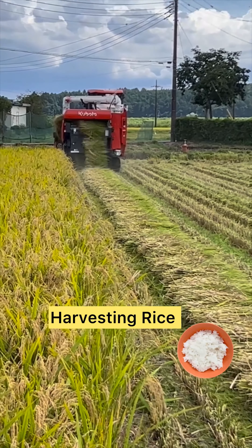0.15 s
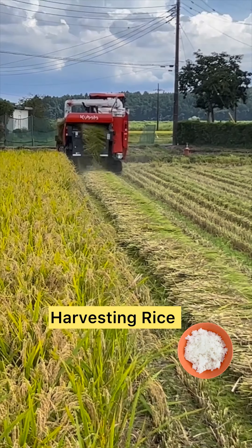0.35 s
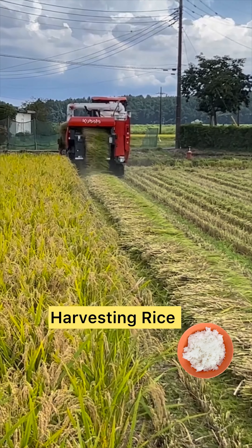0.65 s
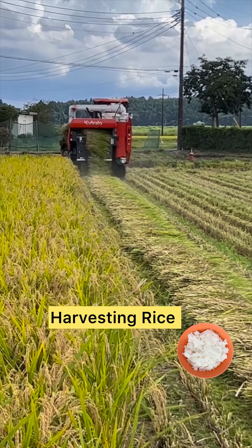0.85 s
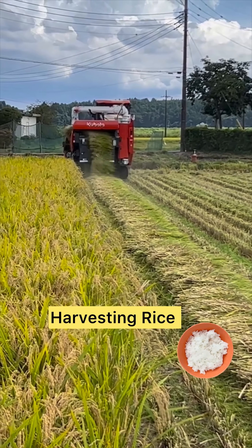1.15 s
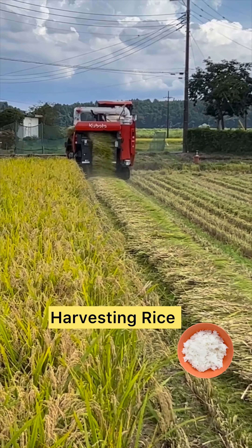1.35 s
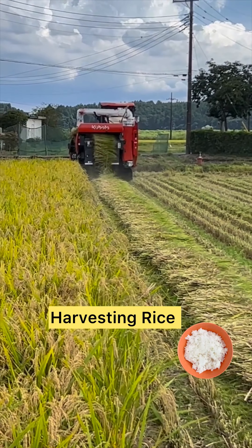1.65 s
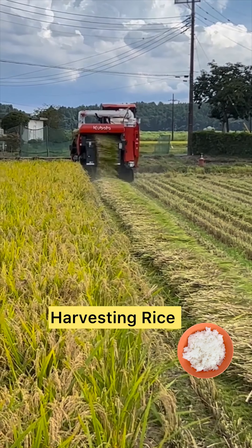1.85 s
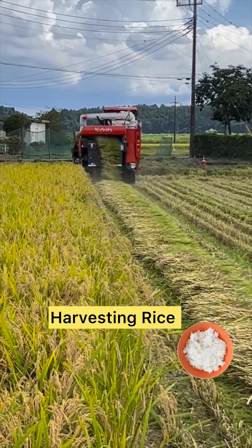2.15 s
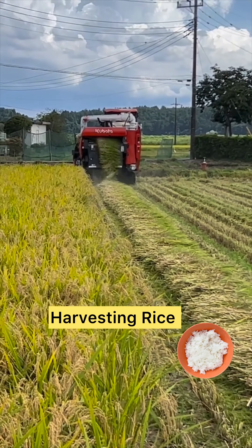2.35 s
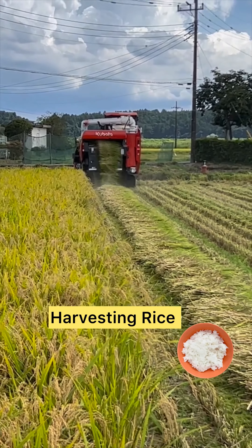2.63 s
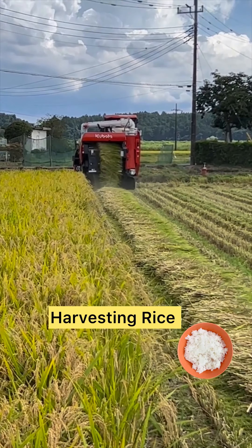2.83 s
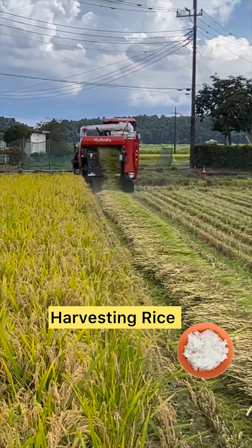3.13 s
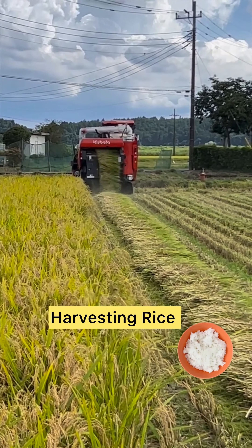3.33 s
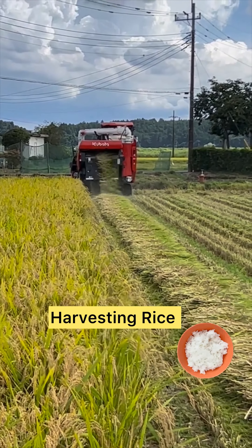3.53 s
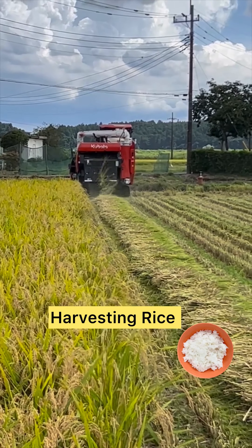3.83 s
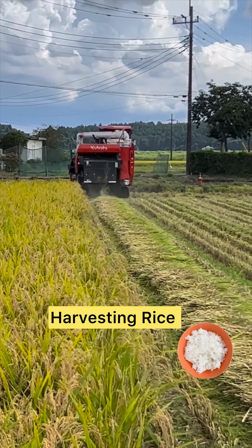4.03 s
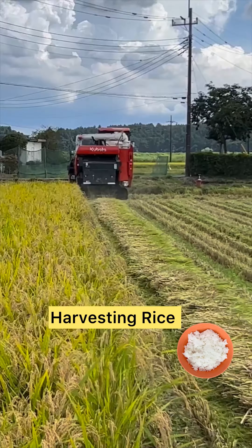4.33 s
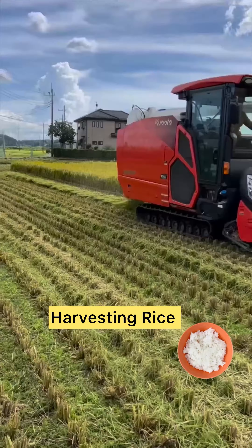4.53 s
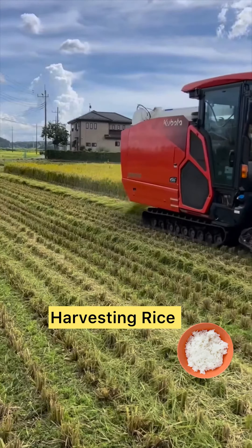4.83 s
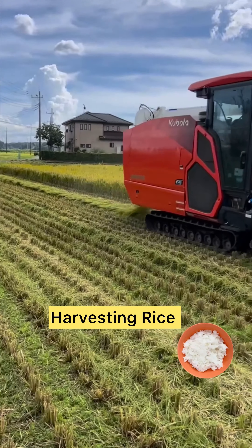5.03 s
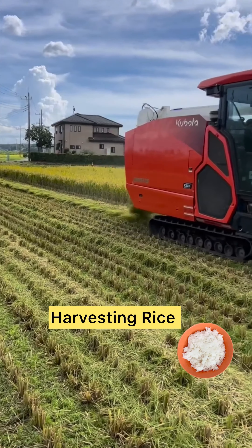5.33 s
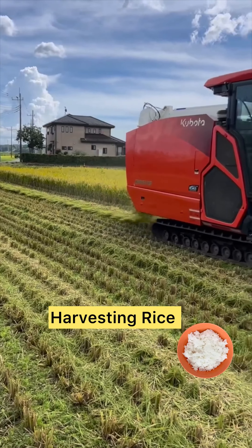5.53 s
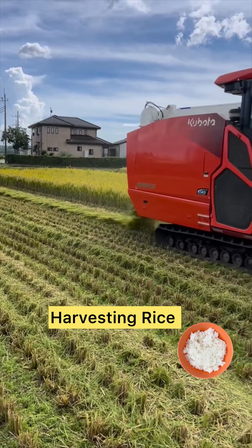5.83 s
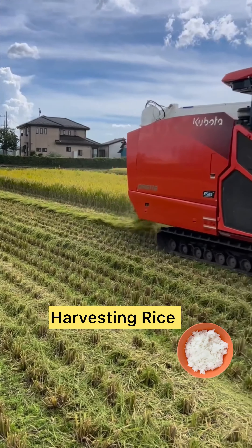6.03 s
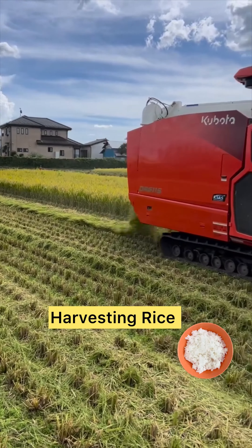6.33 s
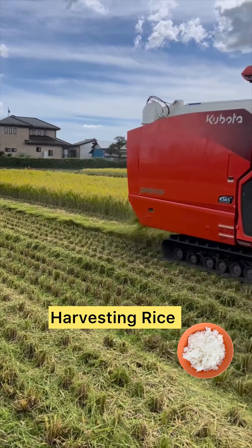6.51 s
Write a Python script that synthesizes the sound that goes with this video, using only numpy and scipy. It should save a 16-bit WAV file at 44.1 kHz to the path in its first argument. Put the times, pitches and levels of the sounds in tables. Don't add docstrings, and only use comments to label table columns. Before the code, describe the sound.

Outdoors in an open rice field, a diesel harvester drones at a distance, its low roar and soft threshing hiss slowly fading as it drives away. Dry leaves rustle faintly near the microphone. At about four and a half seconds a hard cut makes the machine suddenly loud and close, with full engine roar, clattering drum and sieves, a humming fan and a low drive motor that winds up near the end.

```python
import sys
import numpy as np
from scipy import signal
from scipy.fft import rfft, irfft, next_fast_len
from scipy.io import wavfile

SR = 44100
rng = np.random.default_rng(int(sys.argv[2]) if len(sys.argv) > 2 else 0)


def amplitude_ratio(level_db):
    exponent = np.asarray(level_db, float) / 20
    return 10 ** exponent


def persist_wave(psi):
    counts = np.round(np.clip(psi, -1, 1) * 32767).astype(np.int16)
    wavfile.write(sys.argv[1], SR, np.atleast_2d(counts).T)


N = 294147
CUT_S = 4.4537
FAN_HZ = 390.6
THUD_TOP_HZ = 110.3


def rms_one(x):
    return x / np.sqrt(np.mean(x ** 2) + 1e-20)


def at_hz(rows, hz):
    f, *columns = np.transpose(rows)
    return [np.interp(np.log(hz + 1), np.log(f), c) for c in columns]


def smooth_step(t, at_s, width_s):
    return .5 + .5 * np.tanh((t - at_s) / width_s / 2)


def swell(t, at_s, width_s):
    return np.exp(-((t - at_s) / width_s) ** 2 / 2)


def drift(rate, size):
    r = np.exp(-80 * np.pi * rate / SR)
    noise = rng.standard_normal(size // 40 + 4002)
    slow = signal.lfilter([1], [1, -2 * r, r * r], noise)[4000:]
    return np.interp(np.arange(size) / 40, np.arange(len(slow)), rms_one(slow))


def knocking(size, per_s, spread_db, ring_s, share):
    strength = amplitude_ratio(spread_db * np.minimum(rng.exponential(1, size), 3))
    hits = (rng.random(size) < per_s / SR) * strength
    ringing = signal.lfilter([1], [1, -np.exp(-1 / (ring_s * SR))], hits + 1e-18)
    return 1 + share * rms_one(ringing)


def tone(hz, size, wander, beat_db):
    phase = 2 * np.pi * np.cumsum(hz * (1 + wander * drift(2.32, size))) / SR
    beating = amplitude_ratio(beat_db * drift(4.9, size))
    return rms_one(beating * np.sin(phase + rng.uniform(0, 2 * np.pi)))


def wash(spectrum, low_hz, high_hz, gate, together, patchy_db):
    count = len(gate)
    size = next_fast_len(count)
    hz = np.arange(size // 2 + 1) * SR / size
    colour = rfft(gate * rng.standard_normal((2, count)), size) * amplitude_ratio(at_hz(spectrum, hz)[0])
    colour = colour / np.sqrt((1 + (low_hz / (hz + 1)) ** 12) * (1 + (hz / high_hz) ** 12))
    octave = np.log2((hz + 1) / 30)
    out = 0
    for k in range(int(np.log2(low_hz / 45)), int(np.log2(high_hz / 20)) + 2):
        band = np.clip(1 - np.abs(octave - k), 0, 1)
        out = out + irfft(colour * band, size)[:, :count] * amplitude_ratio(patchy_db * drift(1.45, count))
    return rms_one(out * amplitude_ratio(together))


# (time [s], length [s], low edge [Hz], high edge [Hz], level [dB])
RASPS = [
    (.198, .044, 12600, 14000, -48),
    (4.255, .015, 10500, 12500, -54),
    (4.3, .02, 12000, 15500, -53),
    (4.345, .035, 10000, 13500, -52),
    (4.1, .45, 9700, 15700, -53),
    (4.37, .1, 6500, 15700, -48),
]


def leaves(t):
    out = np.zeros((2, len(t)))
    for start, length, low_hz, high_hz, level_db in RASPS:
        now = (t > start) & (t < start + length)
        band = signal.butter(4, [low_hz, high_hz], "band", fs=SR, output="sos")
        hiss = signal.sosfilt(band, rng.standard_normal((2, now.sum())))
        out[:, now] += amplitude_ratio(level_db) * rms_one(hiss) * signal.windows.tukey(now.sum(), .4)
    return out


def far_fan(t):
    bite_s, sag_hz, recover_s = 0.69, 4.03, 0.305
    bitten = smooth_step(t, bite_s, .03) * np.exp(-np.maximum(t - bite_s, 0) / recover_s)
    muted_db = 13 * swell(t, bite_s + 0.035, 0.03)
    hidden_db = 10 * smooth_step(t, 1.77, 0.15)
    return FAN_HZ - sag_hz * bitten, -65, -52 - muted_db - hidden_db


def near_fan(t):
    facing = swell(t, 5.57, 0.43)
    return FAN_HZ, -31.5 + 6.5 * facing, -31.5 - 1.5 * facing


def fan_tones(size, blade_hz, blade_db, octave_db):
    blade = amplitude_ratio(blade_db) * tone(blade_hz, size, wander=0.003, beat_db=2.5)
    return blade + amplitude_ratio(octave_db) * tone(2 * blade_hz, size, wander=0.0028, beat_db=0.0)


def drive_motor(t):
    cruise_hz, fast_hz, cruise_db, fast_db = 60.5, 76.7, -24.5, -21
    fast = smooth_step(t, 5.86, .12)
    level_db = cruise_db + (fast_db - cruise_db) * fast
    level_db = level_db - 3 * swell(t, 5.43, .17) - 7.0 * swell(t, CUT_S, 0.11)
    hz = cruise_hz + (fast_hz - cruise_hz) * fast
    return amplitude_ratio(level_db) * tone(hz, len(t), wander=.018, beat_db=2.2)


def shaft_hum(t, hum):
    middle_s = t.mean()
    return sum(amplitude_ratio(db + db_per_s * (t - middle_s)) * tone(hz, len(t), wander=0.00201, beat_db=1.7)
               for hz, db, db_per_s in hum)


def combustion(size, roar, top_hz, thud_db, roar_db, load):
    firing = knocking(size, 90, spread_db=-6.0, ring_s=0.0071, share=0.18)
    thud = wash(roar, 25, THUD_TOP_HZ, np.ones(size), 0, patchy_db=-0.1)
    roaring = wash(roar, THUD_TOP_HZ, top_hz, firing, 0.19 * load, patchy_db=1.03)
    return amplitude_ratio(thud_db) * thud + amplitude_ratio(roar_db) * roaring


def threshing(size, clatter, low_hz, rustle_hz, clatter_db, rustle_db, load, knock_share):
    beaters = knocking(size, 110, spread_db=4.0, ring_s=0.009, share=knock_share)
    clattering = wash(clatter, low_hz, rustle_hz, beaters, load, patchy_db=0.4)
    rustling = wash(clatter, rustle_hz, 16300, beaters, load, patchy_db=0.68)
    return amplitude_ratio(clatter_db + 4.0) * clattering + amplitude_ratio(rustle_db + 4.5) * rustling


def harvester(t, levels_db, hum, fan, roar, clatter, roar_top_hz, rustle_hz, knock_share, gust_db):
    size = len(t)
    thud_db, roar_db, clatter_db, rustle_db = levels_db
    load = gust_db * drift(4.6, size)
    noise = combustion(size, roar, roar_top_hz, thud_db, roar_db, load)
    noise += threshing(size, clatter, roar_top_hz, rustle_hz, clatter_db, rustle_db, load, knock_share)
    tones = shaft_hum(t, hum) + fan_tones(size, *fan)
    return noise[0] + tones, noise[1]


# (thud, roar, clatter, rustle gain [dB/s])
TURN_GAIN_DB_PER_S = (1.5, 0.72, 2, 6.9)
# (time [s], rise [dB])
LURCHES = [
    (.1, 0.5),
    (.55, 1.5),
    (1.45, 3.5),
    (2.95, 0),
    (3.55, 1),
    (4.72, 8),
    (5.6, 2.5),
    (6.5, 2),
]


def layer_levels(t, start_db, loss_db_per_s, away_until_s):
    turn_s = 0.83
    away = np.minimum(t, away_until_s) - t[0]
    turning = turn_s * np.tanh(np.maximum(t - away_until_s, 0) / turn_s)
    thud_db, *rest = (db - loss * away + gain * turning
                      for db, loss, gain in zip(start_db, loss_db_per_s, TURN_GAIN_DB_PER_S))
    return thud_db + sum(db * swell(t, s, 0.19) for s, db in LURCHES), *rest


def faded(spectrum, hz, gaps, fades, view, size):
    for low, high in gaps:
        spectrum = spectrum * ((hz < low) | (hz > high))
    out = irfft(spectrum, size)
    for low, high, *share in fades:
        chance = drift(11.0, size)
        threshold = np.quantile(chance[::40], 1 - np.clip(share[view], 0, 1))
        lost = np.clip((chance - threshold) / .15, 0, 1)
        out -= lost * irfft(spectrum * (hz > low) * (hz < high), size)
    return out


# (frequency [Hz], side minus mid [dB], quarter-turn likeness [1])
TREBLE_PORTS = [(5520, 10, .4), (6440, 10, -.4), (7000, -1.5, -.5), (7600, -11, -.1), (8900, -3, .5),
                (9550, 4, .4), (9750, -5, .15), (11300, -.5, .45), (11750, 7, 0), (12500, 6.5, 0),
                (12900, 1.7, -.35), (13800, -11, -.07), (15080, -1, .3), (15700, 2.5, .3)]
# (low edge [Hz], high edge [Hz])
MID_GAPS = [(5540, 6420)]
SIDE_GAPS = [(7640, 8900), (13830, 15080)]
# (low edge [Hz], high edge [Hz], time lost far [1], time lost near [1])
MID_FADES = [(11750, 12500, .02, .3)]
SIDE_FADES = [(3700, 4050, .2, .02), (7300, 7640, .25, .3), (9700, 10300, .25, .05),
              (13300, 13830, .15, .2)]


def microphones(direct, scattered, ports, view):
    size = next_fast_len(len(direct))
    hz = np.arange(size // 2 + 1) * SR / size
    side_db, even, quarter = at_hz(ports + [(f, db, 0, q) for f, db, q in TREBLE_PORTS], hz)
    alike = even + 1j * quarter
    alike = alike / np.maximum(1, np.abs(alike))
    unlike = np.sqrt(np.maximum(0, 1 - np.abs(alike) ** 2))
    whole = (hz < 15770) / np.sqrt(1 + amplitude_ratio(2 * side_db))
    mid = rfft(direct, size) * whole
    side = amplitude_ratio(side_db) * (alike * mid + unlike * rfft(scattered, size) * whole)
    mid = faded(mid, hz, MID_GAPS, MID_FADES, view, size)
    side = faded(side, hz, SIDE_GAPS, SIDE_FADES, view, size)
    return np.array([mid + side, mid - side])[:, :len(direct)]


# (frequency [Hz], level mid-view [dB],
# change [dB/s])
FAR_HUM = [(56, -51, -4), (89.6, -45, -3.2), (321.3, -48, .1), (409, -56, -1.5), (450.4, -49, 0.6),
           (642, -65.5, -3)]
# (frequency [Hz], density [dB per Hz])
FAR_ROAR = [(25, -26), (40, -26), (55, -10.5), (90, -13), (180, 2), (260, -7), (340, -12.5), (450, -14),
            (490, -22), (620, -10.5), (660, -21), (900, -12), (1300, -18)]
FAR_CLATTER = [(480, -2.5), (620, -3.5), (680, 2.5), (900, 3.5), (2000, 0.5), (3500, -2), (3850, -4.5),
               (5300, -4.5), (6400, -8), (7000, -6), (8600, -10.5), (9400, -9), (9700, -13), (15700, -14)]
# (frequency [Hz], side minus mid [dB], in-phase likeness [1], quarter-turn likeness [1])
FAR_PORTS = [(60, -19, -0.081, 0.48), (280, -13.5, 0.55, -1.1), (500, -2.5, -0.04, -1.7),
             (620, -7, -0.45, -0.62), (800, -10.5, 0.02, -1.2), (1140, -4, -0.46, -0.65),
             (1340, -11.6, -0.68, -0.16), (1500, -35.6, -0.14, 0.0), (2000, -48, -0.0, 0.05),
             (2057, -3, -0.02, 0.59), (2630, 5, 0.023, 0.64), (3900, -8, -0.013, 0.34),
             (4570, 0.5, -0.01, 0.56), (5120, -3.5, 0.03, 0.62)]


def far_view(t):
    start_db, loss_db_per_s = (-31.5, -34.5, -47, -47), (2.05, 1.07, 0.86, 0.97)
    levels_db = layer_levels(t, start_db, loss_db_per_s, 2.74)
    sound = harvester(t, levels_db, FAR_HUM, far_fan(t), FAR_ROAR, FAR_CLATTER,
                      roar_top_hz=470, rustle_hz=2300, knock_share=.1, gust_db=.4) + leaves(t)
    return microphones(*sound, FAR_PORTS, 0)


# (frequency [Hz], level mid-view [dB], change [dB/s])
NEAR_HUM = [(92.4, -35, -5.5), (186.5, -34, 3), (233.3, -32.5, -4), (278, -36, -5.5), (322.3, -33, 4.5),
            (413.3, -32.5, -1.5), (461, -31.5, -0.2), (510, -39.5, 1.5), (644.4, -37, 4.5), (899, -39.5, 2),
            (1174, -47, 9), (1306, -46, 4)]
# (frequency [Hz], density [dB per Hz])
NEAR_ROAR = [(25, -34), (38, -17.5), (55, -2.5), (90, -3), (120, -4), (250, -8), (310, -11.5), (500, -10.5),
             (800, -9.5), (900, -15), (950, -24), (1050, -17), (1400, -20)]
NEAR_CLATTER = [(800, 3), (1300, 3.5), (1900, -0.9), (2250, 0.5), (2850, -8), (3200, -6), (4700, -8.5),
                (5300, -5.5), (6500, -9.5), (8000, -11.5), (9400, -10.5), (9700, -16), (12000, -15.5),
                (15700, -16)]
# (frequency [Hz], side minus mid [dB], in-phase likeness [1], quarter-turn likeness [1])
NEAR_PORTS = [(70, -15, 0, -.3), (160, -21, .2, -.3), (300, -13, .5, -.3), (480, -13, .06, -.48),
              (600, -21, .33, -.17), (780, -8.5, .93, -.11), (1000, -9.7, .4, -.39), (1350, -17, .46, -.12),
              (1560, -30, .07, 0), (1800, -13, .05, .3), (2400, 4.4, .19, .82), (3000, -3, -.42, .08),
              (4800, -1.7, -.46, .26), (5200, 1.5, -.18, .56)]


def near_view(t):
    start_db, loss_db_per_s = (-30, -17.5, -26.5, -31), (.6, 1.1, 1.2, 1.6)
    levels_db = layer_levels(t, start_db, loss_db_per_s, t[-1])
    direct, scattered = harvester(t, levels_db, NEAR_HUM, near_fan(t), NEAR_ROAR, NEAR_CLATTER,
                                  roar_top_hz=980, rustle_hz=3100, knock_share=0.14, gust_db=0.28)
    return microphones(direct + drive_motor(t), scattered, NEAR_PORTS, 1)


def scene():
    t, cut = np.arange(N) / SR, round(CUT_S * SR)
    before, after = t[:cut], t[cut:]
    far = far_view(before) * np.clip((CUT_S - before) / 0.00092, 0, 1)
    near = near_view(after) * np.clip((after - CUT_S) / .0006, 0, 1)
    return np.concatenate([far, near], axis=1)


def low_pass(x):
    return signal.sosfilt(signal.butter(12, 16090, fs=SR, output="sos"), x)


def record(dry):
    mix = np.clip(dry, -.95, .95)
    return low_pass(mix)


dry = scene()
out = record(dry)
persist_wave(out)
```